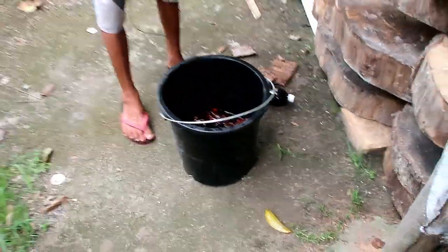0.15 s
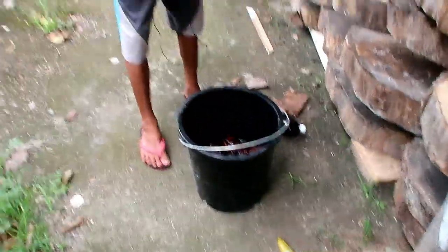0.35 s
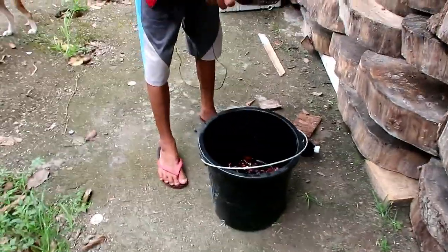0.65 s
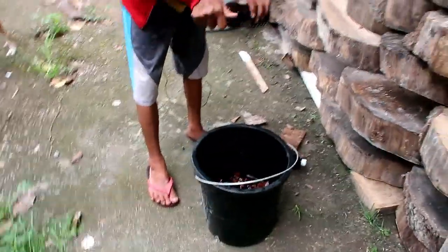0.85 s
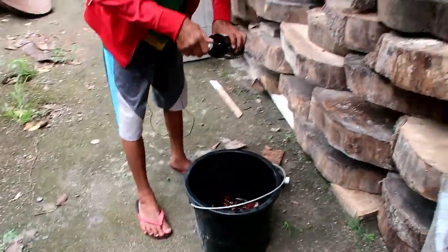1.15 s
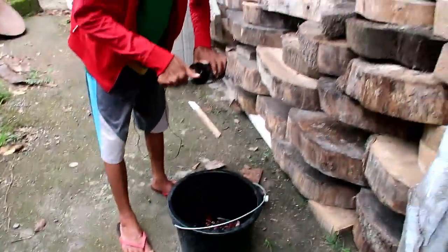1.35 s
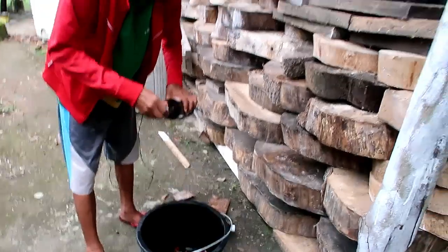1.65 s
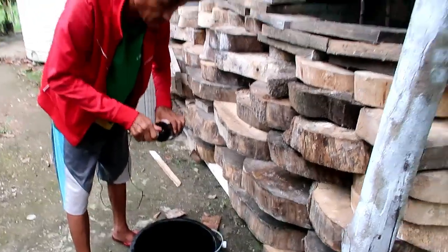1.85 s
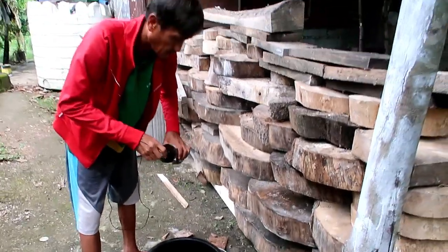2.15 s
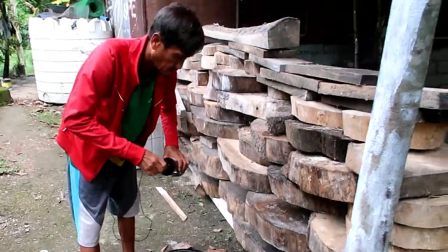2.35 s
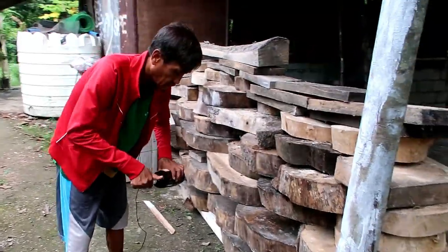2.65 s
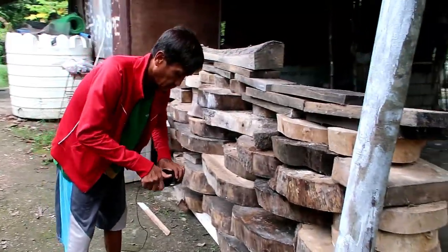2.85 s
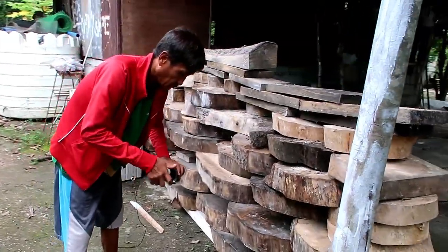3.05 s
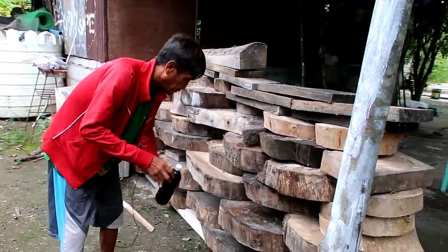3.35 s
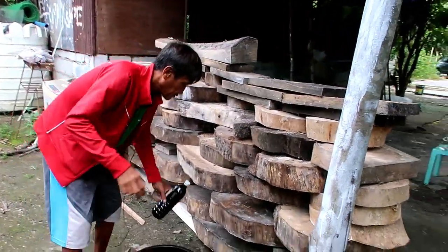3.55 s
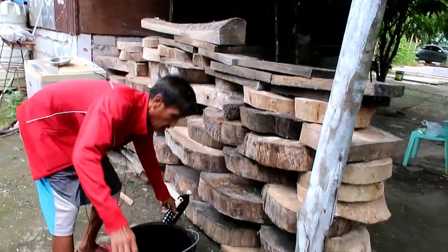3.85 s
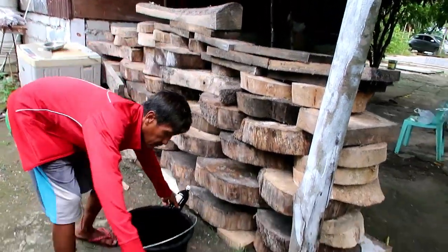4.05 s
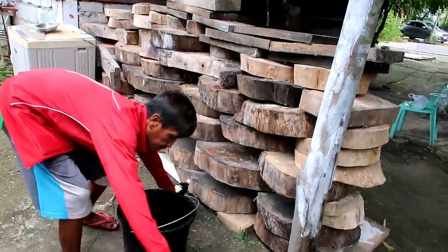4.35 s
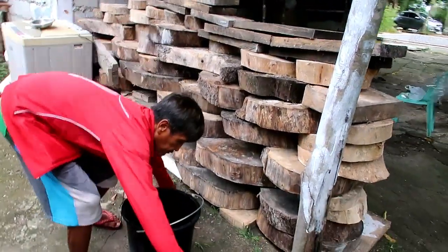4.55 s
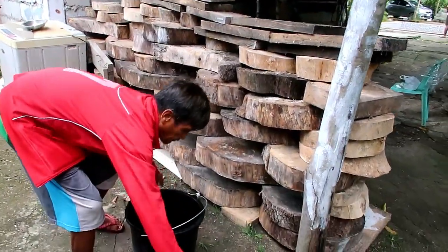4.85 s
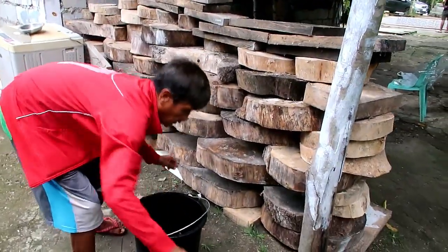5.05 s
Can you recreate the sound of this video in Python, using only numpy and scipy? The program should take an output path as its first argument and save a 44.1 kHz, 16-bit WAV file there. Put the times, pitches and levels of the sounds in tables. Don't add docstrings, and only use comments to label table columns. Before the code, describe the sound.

Sporadic plastic clacks and light knocks of a bottle against a bucket, with a gritty twisting cap and brief squeaks, in a quiet yard.

```python
import sys
import numpy as np
from scipy import signal
from scipy.fft import rfft, irfft, next_fast_len
from scipy.io import wavfile
from scipy.ndimage import uniform_filter1d, map_coordinates

SR = 44100
rng = np.random.default_rng(int(sys.argv[2]) if len(sys.argv) > 2 else 0)


def persist_wave(psi):
    counts = np.round(np.clip(psi, -1, 1) * 32767).astype(np.int16)
    wavfile.write(sys.argv[1], SR, np.atleast_2d(counts).T)


def ratio(d):
    e = np.asarray(d, float) / 20
    return 10 ** e


N = 229011
T = np.arange(N) / SR

# time [s], level [dB].
YARD_LEVEL = [(0.0, -57), (0.2, -48.5), (0.35, -63), (0.66, -58.5), (1.1, -67.5), (1.33, -62),
              (1.81, -63.5), (2.01, -53.5), (2.2, -59), (2.82, -58), (3.18, -61.5), (3.48, -66.5),
              (3.76, -62), (3.98, -63), (4.29, -62.5), (4.36, -57.5), (4.58, -66), (5.19, -66.5)]
# time [s], level [dB].
AIR_LEVEL = [(0.0, -60), (0.2, -62), (0.98, -75), (1.31, -71.5), (1.47, -66), (1.65, -75.5), (1.9, -64),
             (2.14, -55.5), (2.27, -61), (2.57, -59), (2.88, -63), (3.08, -68), (3.21, -58), (3.35, -68),
             (3.48, -70), (3.63, -76), (3.87, -69), (4.4, -66.5), (4.58, -77), (4.83, -76.5), (5.19, -70.5)]
# start [s], time held [s], lift [dB].
OPENINGS = [(0.173, 0.077, 10.5), (0.283, 0.022, 12.5), (0.353, 0.013, 16.5), (0.562, 0.021, 13.5),
            (0.887, 0.038, 12.5), (0.979, 0.08, 11.5), (1.76, 0.044, 9.5), (1.793, 0.039, 15.5),
            (1.93, 0.054, 4.5), (2.048, 0.0079, 14.5), (2.087, 0.013, 16.5), (2.209, 0.017, 10),
            (2.376, 0.0056, 7.5), (2.466, 0.062, 8), (2.744, 0.054, 9), (2.883, 0.13, 12),
            (3.137, 0.093, 14.5), (3.326, 0.13, 9.5), (3.415, 0.049, 12), (3.527, 0.03, 12),
            (3.673, 0.033, 16), (3.836, 0.045, 11), (3.909, 0.073, 8), (4.089, 0.17, 13),
            (4.345, 0.042, 14), (4.39, 0.063, 10.5), (4.483, 0.036, 10), (4.869, 0.035, 5.5),
            (5.04, 0.09, 6), (5.16, 0.036, 10.5)]
# start [s], length [s], change [dB].
HISS_DUCKS = [
    (0.155, .014, -16),
    (3.822, .012, -18),
    (4.149, .015, -10),
]
# centre [s], change [dB].
HISS_SWINGS = [
    (0.199, -12.5),
    (2.0, 7),
    (3.78, -3),
    (4.241, -2.5),
]
# frequency [Hz], density [dB per Hz].
RUMBLE_SPECTRUM = [(20, -40), (40, -15.5), (70, -1.5), (110, 3), (200, -1.5), (320, -10.5), (520, -32.5),
                   (880, -120)]
# frequency [Hz], density [dB per Hz].
MURMUR_SPECTRUM = [(88, -25), (170, -7.5), (300, -6), (550, -4.5), (1500, -12), (4000, -24), (5200, -53.5),
                   (8800, -120)]
# frequency [Hz], density [dB per Hz].
HISS_SPECTRUM = [(880, -31.5), (1500, -1.5), (2030, -7.5), (2480, -4.5), (4760, -7.5), (8770, -14),
                 (14600, -26.5), (16500, -28.5)]
# frequency [Hz], time to fall 60 dB [s].
WOODPILE_DECAY = [(200, 0.02), (600, 0.14), (1500, 0.13), (4000, 0.086), (12000, 0.091)]
# peak time [s], fall [s], level [dB], centre [Hz], width [Hz].
SLEEVE_RUSTLES = [(0.146, 0.023, -52.5, 4400, 4940), (0.365, 0.0031, -54, 4160, 3350),
                  (0.69, 0.019, -57, 3480, 2500), (0.922, 0.0068, -56, 2920, 400),
                  (1.019, 0.0087, -45, 5440, 350), (1.018, 0.013, -47.5, 1350, 2250),
                  (1.98, 0.041, -47.5, 3700, 1389), (1.979, 0.036, -45.5, 7100, 2960),
                  (1.97, 0.013, -60, 12600, 2500), (3.716, 0.018, -60, 4250, 740),
                  (3.975, 0.029, -53.5, 3800, 1470), (3.985, 0.007, -60.5, 7970, 3030),
                  (4.126, 0.025, -45.5, 4230, 1500), (4.128, 0.024, -48, 7850, 1990),
                  (4.13, .022, -55, 11500, 3990), (4.36, 0.0085, -43.5, 4200, 900),
                  (4.365, 0.033, -49.5, 2300, 540), (4.497, 0.012, -49, 4180, 1490),
                  (4.498, 0.0114, -54.5, 8400, 2500)]
# peak time [s], fall [s],
# level [dB], centre [Hz], width [Hz].
FINGER_FLICKS = [
    (0.573, 0.0096, -61, 6389, 5600),
    (0.9088, 0.0058, -34.5, 3300, 556),
    (0.909, 0.018, -48.5, 5540, 600),
    (0.909, 0.011, -47.5, 12500, 2405),
    (0.909, 0.0092, -47, 9100, 1100),
    (4.103, 0.0041, -36, 4180, 1513),
]
# time [s], grip level [dB], pitch of the slips [Hz].
CAP_TWISTS = [
    [(2.46, -75, 2540), (2.474, -51.5, 2480), (2.508, -38, 2430), (2.546, -67, 2500), (2.57, -61, 2550)],
    [(2.74, -49, 2940), (2.75, -42, 3080), (2.788, -36, 2420), (2.806, -50, 2540), (2.86, -66, 2920)],
    [(2.925, -65, 2580), (2.935, -42, 2540), (2.983, -30.5, 2350), (3.001, -45.5, 2430), (3.047, -55, 2590),
     (3.08, -66, 2500)],
    [(3.135, -57, 2740), (3.145, -36.5, 2640), (3.169, -37.5, 2650), (3.185, -31.5, 2700),
     (3.31, -76, 2670)],
]
# frequency [Hz], width [Hz].
CAP_RESONANCES = [(2300, 350), (2780, 256), (3340, 96)]
# start [s], length [s], pitch [Hz], level [dB], overtone step [dB].
STICK_SQUEAKS = [
    (1.851, 0.038, 1540, -50, -6.5),
    (1.89, 0.037, 1513, -61, -15),
    (1.929, 0.033, 3980, -43, -5),
    (1.958, 0.036, 4000, -50, -9),
    (2.0, .014, 3900, -53, -12),
    (4.323, 0.015, 1600, -57, -24),
    (4.419, 0.027, 2070, -41, -32),
    (4.477, 0.022, 2040, -50, -26),
]
# start [s], level [dB].
CAP_CHIRPS = [
    (2.934, -39),
    (3.136, -49),
]
# frequency [Hz], level [dB], time to fall 60 dB [s].
BUCKET_MODES = [(252, -5, 0.031), (324, -3.5, 0.051), (404, 1.5, 0.016), (520, 0, 0.02), (613, -4.5, 0.033),
                (764, -3, 0.018), (900, 0, 0.016), (1102, 2.5, 0.011), (1230, -3.5, 0.015)]
# time [s], bucket [dB], shell [dB], snap [dB], shell ring [Hz].
FULL_BLOWS = [(0.1496, -41.5, -42, -35, 2950), (0.1745, -18, -9.5, -13, 3550), (0.1767, -21, -8, -26, 2160),
              (0.2145, -26.5, -21, -22, 3600), (0.2178, -23.5, -17.5, -30, 2980),
              (1.0153, -37, -37, -46, 2770), (1.0246, -42, -34, -41, 3020),
              (1.8144, -37.5, -28.5, -39.5, 2390), (1.8283, -31.5, -34, -35, 1220),
              (2.0915, -29.5, -22, -29, 3900), (2.0973, -29, -46, -45, 1230),
              (2.2246, -28.5, -22, -27.5, 3360), (3.5347, -44.5, -36, -38.5, 3800),
              (4.1039, -48, -36, -37, 4000), (4.1694, -16, -9.5, -12.5, 2660),
              (4.172, -24.5, -25, -33, 2016), (4.1755, -25.5, -38.5, -24.5, 1304),
              (4.182, -23, -28, -37.5, 1300), (4.1884, -19, -15, -27, 2840), (4.377, -34, -33, -29, 1250)]
# time [s], bucket [dB], shell [dB], shell ring [Hz],
# wall tilt [dB per octave].
DULL_KNOCKS = [(0.181, -22.5, -18.5, 2220, -12), (0.3642, -35.5, -25.5, 3350, -5),
               (0.3682, -30.5, -28, 1290, -5.5), (0.5074, -43, -57, 3340, -6.5),
               (0.5686, -36, -33, 1325, 5), (1.008, -47, -39.5, 2980, .1), (1.8185, -33, -31.5, 1250, -1),
               (1.9088, -51, -47, 1590, .1), (2.053, -29, -21.5, 2480, -2.5), (2.2275, -40, -42, 3740, -6),
               (2.3867, -37.5, -34.5, 1710, -2), (2.9064, -22.5, -21, 2650, 2.5),
               (3.3259, -49, -46.5, 2760, 0), (3.836, -42, -43.5, 1310, -1),
               (3.8409, -17.5, -18.5, 4300, -2.5), (3.8447, -30.5, -24.5, 2300, -2),
               (3.863, -38, -42, 2400, 0), (4.167, -30.5, -34, 1300, 0), (4.1934, -29, -24, 2374, 3),
               (4.2415, -29, -33.5, 2270, -5.5), (4.3979, -29.5, -34, 1220, 6),
               (5.0406, -45.5, -63, 1230, 0.5), (5.091, -48, -57.5, 2430, 0), (5.161, -61, -48.5, 1690, -3)]
# time [s], shell [dB], snap [dB], snap ring [Hz].
CREASE_TICKS = [(0.1117, -55, -48, 8750), (0.1732, -28, -12, 9240), (0.2334, -29.5, -23.5, 8960),
                (0.291, -41, -25, 9200), (0.5791, -56, -39, 6600), (0.6799, -49, -44, 7800),
                (0.9096, -50, -32, 5300), (0.9138, -44, -30, 5550), (0.9942, -49, -43, 7800),
                (1.0247, -50, -32, 10900), (1.9515, -44, -25, 9600), (2.0122, -36, -26, 6400),
                (2.2103, -51, -43, 9400), (3.3843, -56, -37, 7600), (3.5341, -62, -44, 14500),
                (4.1883, -28, -18.5, 9160)]
# start [s], level [dB], pitch [Hz], time to fall 60 dB [s].
SOFT_THUDS = [(3.6931, -21, 201, 0.06), (3.6932, -18.5, 290, 0.04), (3.6935, -28, 490, 0.035),
              (3.6933, -33, 938, 0.03), (3.6933, -37, 710, 0.022), (3.7033, -31, 250, 0.027),
              (3.713, -38.5, 200, 0.045), (3.713, -41, 900, .03), (3.674, -47, 470, .02),
              (5.041, -42.5, 473, 0.039), (5.052, -43, 384, 0.047)]
# start [s], level [dB], pitch [Hz],
# time to fall 60 dB [s].
CLEAN_RINGS = [(0.1738, -3, 980, 0.0096), (0.1739, -7, 743, .024), (0.1745, -17, 270, .03),
               (0.1755, -5, 407, .03), (0.1745, -10.5, 3560, 0.017), (0.1748, -21, 5720, .014),
               (0.176, -16.5, 1460, 0.027), (0.176, -15.5, 1685, .035), (0.179, -22, 2120, .025),
               (0.177, -21, 2500, 0.03), (0.1725, -20, 3000, .008), (0.9078, -33, 3400, .014),
               (0.2141, -2, 3500, .0045), (0.2141, -10, 4500, .004), (1.015, -30, 2700, .006),
               (1.0268, -38, 12500, .008), (0.2141, -12.5, 5550, .006), (0.2141, -21, 8900, .006),
               (0.2178, -14.5, 1480, 0.0095), (0.2178, -16.5, 3200, .012), (0.2328, -29, 3835, 0.0074),
               (0.9938, -41, 5600, .012), (1.006, -38, 5500, .015), (1.0193, -37, 3300, .01),
               (1.0193, -40, 800, .01), (1.0243, -21, 3010, .005), (1.0243, -36, 800, .01),
               (4.169, -2, 898, .009), (4.1688, -8.5, 2740, 0.0069), (4.17, -9.5, 435, .035),
               (4.1692, -17, 1500, .01), (4.1692, -26, 8800, .006), (4.17, -19, 270, .03),
               (4.1698, -14.5, 646, .035), (4.167, -26, 900, .01), (4.1715, -19.5, 1920, .02),
               (4.1755, -22, 1050, 0.017), (4.1872, -28, 5900, .008)]


def unit(x):
    return x / np.sqrt(np.mean(x ** 2) + 1e-20)


def peak(x):
    return x / np.abs(x).max()


def along(points, hz):
    f, v = np.transpose(points)
    return np.interp(np.log(hz + 1), np.log(f + 1), v)


def filtered(x, response):
    m = next_fast_len(len(x) + 8192)
    return irfft(rfft(x, m) * response(np.fft.rfftfreq(m, 1 / SR)), m)[:len(x)]


def resonance(centre_hz, width_hz):
    return lambda f: 1j * f * width_hz / (centre_hz ** 2 - f * f + 1j * f * width_hz)


def low_cut(corner_hz, order):
    return lambda f: (1j * f / (corner_hz + 1j * f)) ** order


def wobble(rate, n=N):
    return map_coordinates(rng.standard_normal(int(n * rate / SR) + 4), [np.arange(n) * rate / SR])


def add(out, s, x):
    part = out[round(s * SR):][:len(x)]
    part += x[:len(part)]


def rush(spectrum, patchy_db):
    z = signal.stft(rng.standard_normal(N + SR // 10), nperseg=512)[2]
    field = uniform_filter1d(rng.standard_normal(z.shape), 6, 0)
    field = uniform_filter1d(field, 8, 1)
    x = signal.istft(z * ratio(patchy_db * unit(field)), nperseg=512)[1][:N]
    return unit(filtered(x, lambda hz: ratio(along(spectrum, hz))))


def suppressor_lift():
    lift = np.zeros(N)
    for start, held, db in OPENINGS:
        opening = np.clip((T - start) / 0.0013, 0, 1)
        closing = np.exp(-np.clip(T - start - held, 0, None) / 0.028)
        lift = np.maximum(lift, db * opening * closing)
    return lift


def yard():
    mean_hiss_db, hiss_follows, swing_s = -68, 0.9, 0.063
    lift = suppressor_lift()
    air_db = np.interp(T, *np.transpose(AIR_LEVEL))
    murmur_db = np.interp(T, *np.transpose(YARD_LEVEL))
    hiss_db = mean_hiss_db + hiss_follows * (murmur_db - murmur_db.mean())
    for s, db in HISS_SWINGS:
        hiss_db = hiss_db + db * np.exp(-np.abs(T - s) / swing_s)
    for start, length, db in HISS_DUCKS:
        hiss_db = hiss_db + db * ((T > start) & (T < start + length))
    rumble = ratio(air_db + 4.5 + 0.28 * lift) * rush(RUMBLE_SPECTRUM, patchy_db=2.2)
    murmur = ratio(murmur_db + 0.76 * lift + 0.56 * wobble(20)) * rush(MURMUR_SPECTRUM, patchy_db=1.5)
    hiss = ratio(hiss_db + 0.96 * lift) * rush(HISS_SPECTRUM, patchy_db=1.5)
    steady = ratio(-89.5) * rush([(7000, -30.5), (12000, -2.5), (16000, 2.5)], patchy_db=2.0)
    return rumble + murmur + hiss + steady


def woodpile(x):
    out, step = np.zeros(N), SR * 3 // 10
    for i in range(0, N, step):
        hz, t, z = signal.stft(rng.standard_normal(SR // 4), SR, nperseg=128)
        decay = ratio(-60 * t / along(WOODPILE_DECAY, hz)[:, None])
        tail = signal.istft(z * decay, SR, nperseg=128)[1]
        answer = signal.fftconvolve(x[i:i + step], tail / np.linalg.norm(tail))
        add(out, i / SR + 0.0022, answer)
    return out


def rubs(rows, rise_over_fall):
    out, t = np.zeros(N), T[:SR // 4] - 0.1
    for s, fall, db, hz, width_hz in rows:
        grains = rng.standard_normal(len(t)) * ratio(1.5 * wobble(350, len(t)))
        swell = np.exp(-(t / np.where(t < 0, rise_over_fall * fall, fall)) ** 2)
        body = resonance(hz, 1.5 * width_hz)
        add(out, s - 0.1, ratio(db) * swell * unit(filtered(grains, lambda f: body(f) ** 2)))
    return out


def rustles():
    return rubs(SLEEVE_RUSTLES, rise_over_fall=0.85) + rubs(FINGER_FLICKS, rise_over_fall=0.21)


def cap():
    spread_hz, floor_db = 440, -11.5
    out = np.zeros(N)
    for rows in CAP_TWISTS:
        s, grip_db, slip_hz = np.transpose(rows)
        share_db = np.array([np.maximum(-9 * ((slip_hz - hz) / spread_hz) ** 2, floor_db)
                             for hz, _ in CAP_RESONANCES])
        levels = grip_db + share_db - 10 * np.log10(np.sum(ratio(share_db) ** 2, axis=0))
        t = s[0] + T[:round((s[-1] - s[0]) * SR)]
        for (hz, width_hz), db in zip(CAP_RESONANCES, levels):
            clumped = rng.standard_normal(len(t)) * ratio(2.1 * wobble(192.5, len(t)))
            body = resonance(hz, 1.5 * width_hz)
            ring = unit(filtered(clumped, lambda f: body(f) ** 2))
            add(out, s[0], ratio(np.interp(t, s, db)) * ring * signal.windows.tukey(len(t), 0.1))
    return out


def squeak(length, start_hz, end_hz, db, step_db):
    n = round(length * SR)
    pitch_shake = wobble(1570, SR // 8)[:n]
    level_shake = wobble(276, SR // 8)[:n]
    rough = 0.033 * (start_hz / 4000) ** 2
    pitch = np.linspace(start_hz, end_hz, n) * (1 + rough * pitch_shake)
    phase = 2 * np.pi * np.cumsum(pitch) / SR
    tone = np.zeros(n)
    for k in range(5):
        if (k + 1) * start_hz < 13000:
            tone += ratio(k * step_db - 6 * (k == 2)) * np.sin((k + 1) * phase)
    edges = np.clip(0.9 - start_hz / 6000, 0.1, 1)
    return ratio(db + 2.6 * level_shake) * tone * signal.windows.tukey(n, edges)


def squeaks():
    out = np.zeros(N)
    for s, length, hz, db, step_db in STICK_SQUEAKS:
        add(out, s, squeak(length, hz, 0.985 * hz, db, step_db))
    for s, db in CAP_CHIRPS:
        add(out, s, squeak(0.0141, 2120, 3020, db, step_db=-30))
    return out


def contacts():
    snap_hz, tilt = 5300, 0.5
    blows = [(*row, snap_hz, tilt) for row in FULL_BLOWS]
    dull = [(s, wall, shell, shell - 23.5, hz, snap_hz, own_tilt)
            for s, wall, shell, hz, own_tilt in DULL_KNOCKS]
    ticks = [(s, shell - 10, shell, snap, 3200, hz, tilt) for s, shell, snap, hz in CREASE_TICKS]
    return blows + dull + ticks


def bucket_wall(t, press, tilt):
    wall = np.zeros(len(t))
    for k, (hz, level, t60) in enumerate(BUCKET_MODES):
        level_draw, pitch_draw = rng.standard_normal(2)
        db = level + tilt * np.log2(hz / 550) + 2.4 * level_draw - 60 * t / t60
        wall += ratio(db) * np.sin(2 * np.pi * hz * (1 + 0.036 * pitch_draw) * t) * (-1) ** (k // 3)
    return filtered(press * wall, low_cut(200, 4))


def bottle_shell(t, press, blow, ring_hz):
    chatter = 0.66 * ratio(-60 * t / 0.0087) + 0.12 * ratio(-60 * t / 0.041)
    contact = blow + rng.standard_normal(len(t)) * press * chatter
    ring, broad, body = resonance(ring_hz, 0.3 * ring_hz), resonance(2300, 2500), resonance(2400, 5000)
    return filtered(contact, lambda f: (ring(f) + 0.5 * broad(f)) * body(f) ** 3)


def plastic_snap(t, press, blow, snap_hz):
    click = 2.1 * blow ** 4 + rng.standard_normal(len(t)) * press * ratio(-60 * t / 0.0082)
    edge, air = resonance(snap_hz, 2500), resonance(11000, 7000)
    return filtered(click, lambda f: edge(f) ** 2 + 0.72 * (snap_hz / 9000) ** 2 * air(f) ** 2)


def decaying_tones(rows, rise_s, shortest_s):
    out, t = np.zeros(N), T[:SR // 8]
    for s, db, hz, t60 in rows:
        fade = ratio(db - 60 * t / np.clip(t60, shortest_s, 0.07))
        add(out, s, -fade * np.sin(2 * np.pi * hz * t) * (1 - np.exp(-t / rise_s)))
    return out


def knocks():
    out, t = np.zeros(N), T[:SR // 8]
    press = 1 - np.exp(-(t / 0.00037) ** 2)
    blow = np.exp(-((t - 0.0006) / 0.00004) ** 2)
    for s, bucket_db, shell_db, snap_db, ring_hz, snap_hz, tilt in contacts():
        wall = ratio(bucket_db) * peak(bucket_wall(t, press, tilt))
        shell = ratio(shell_db) * peak(bottle_shell(t, press, blow, ring_hz))
        snap = ratio(snap_db - 3.0) * peak(plastic_snap(t, press, blow, snap_hz))
        add(out, s - 0.0009, wall + shell + snap)
    thuds = decaying_tones(SOFT_THUDS, rise_s=0.00095, shortest_s=0.01)
    rings = decaying_tones(CLEAN_RINGS, rise_s=0.00029, shortest_s=0.003)
    return out + filtered(rings, low_cut(120, 3)) + filtered(thuds, low_cut(80, 2))


def scene():
    far = yard()
    hands, squeal, hits = rustles() + cap(), squeaks(), knocks()
    answer = woodpile(ratio(-13.5) * hits + ratio(-8.0) * hands + ratio(-10) * squeal)
    return (hits + hands + squeal + answer + far)[None]


def band_limit(x):
    return signal.sosfilt(signal.butter(12, 16970, fs=SR, output="sos"), x)


def record(dry):
    top_hz = 15800
    heard = dry[0] / (1 + np.abs(dry[0] / 0.93) ** 6) ** (1 / 6)
    heard = filtered(heard, lambda f: low_cut(60, 1)(f) / np.sqrt(1 + (f / top_hz) ** 140))
    return band_limit(heard[None])


dry = scene()
out = record(dry)
persist_wave(out)
```